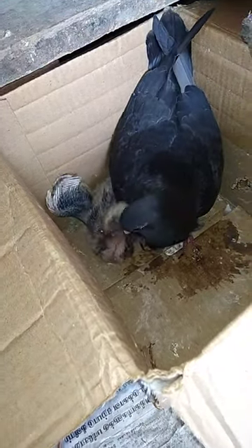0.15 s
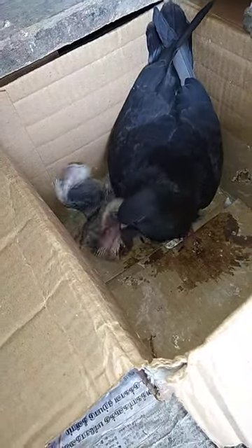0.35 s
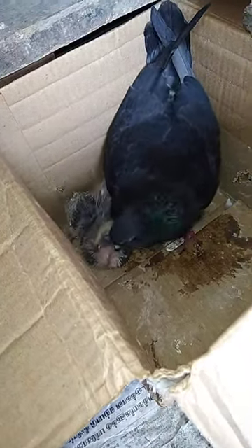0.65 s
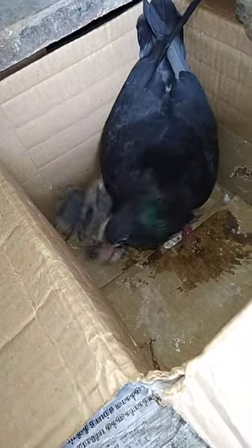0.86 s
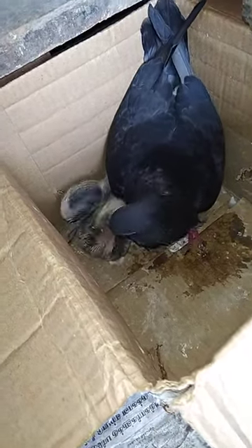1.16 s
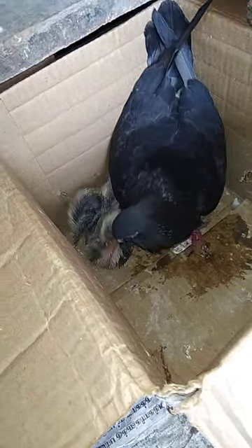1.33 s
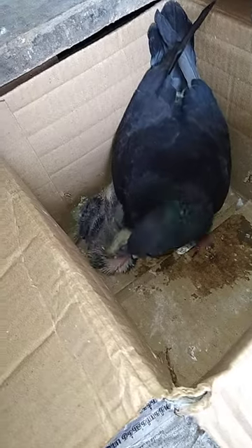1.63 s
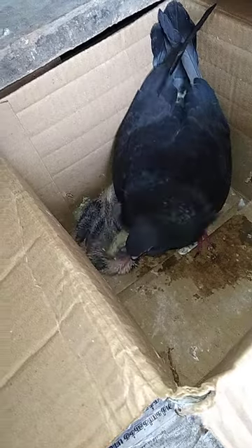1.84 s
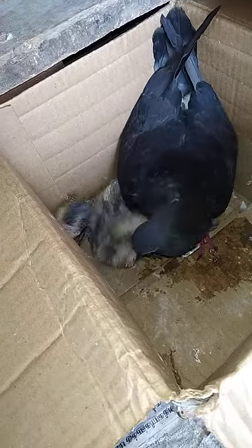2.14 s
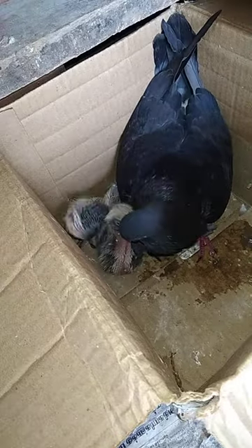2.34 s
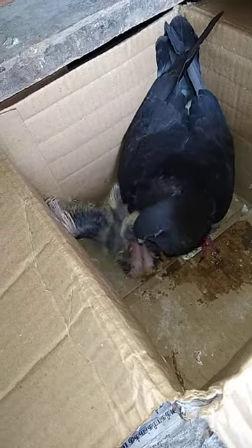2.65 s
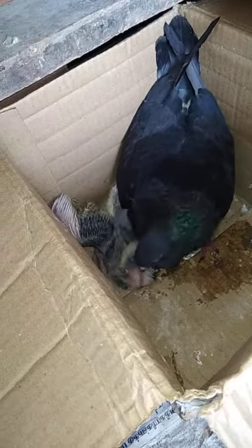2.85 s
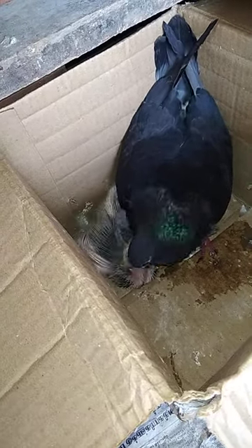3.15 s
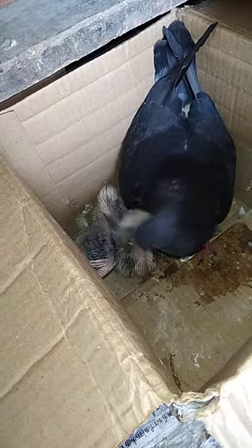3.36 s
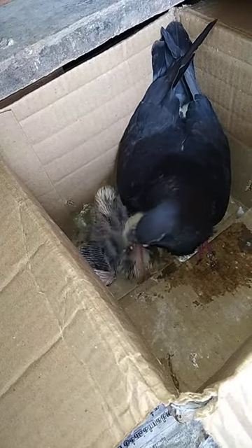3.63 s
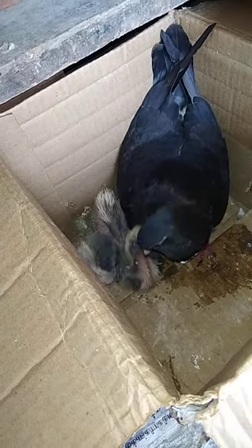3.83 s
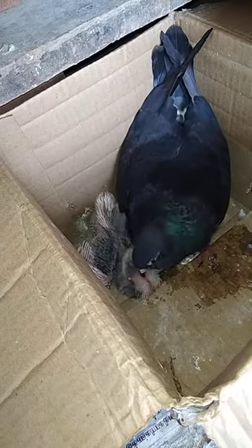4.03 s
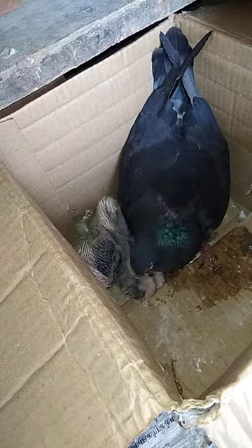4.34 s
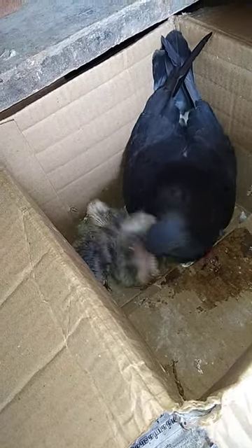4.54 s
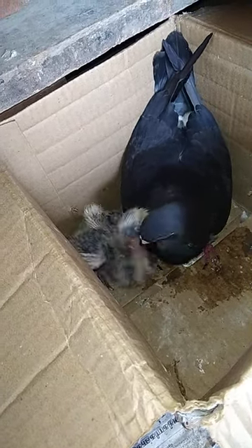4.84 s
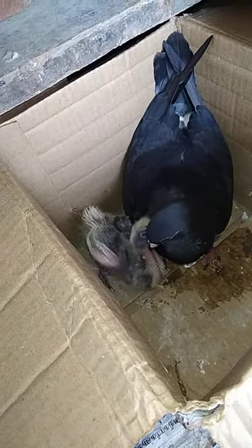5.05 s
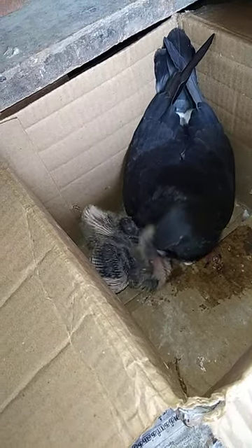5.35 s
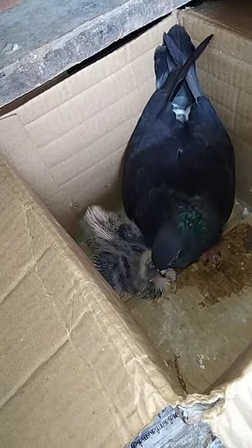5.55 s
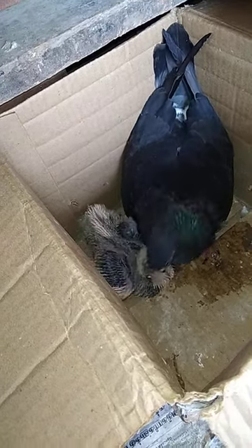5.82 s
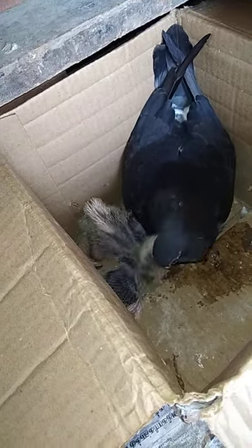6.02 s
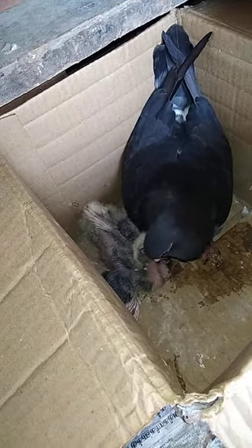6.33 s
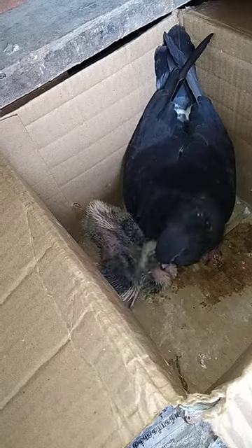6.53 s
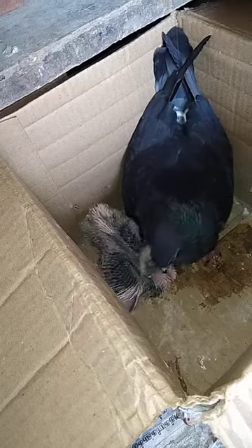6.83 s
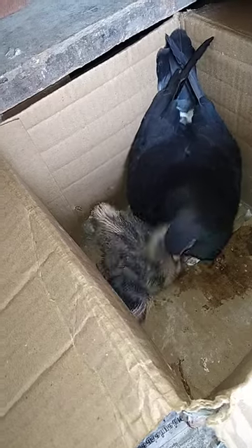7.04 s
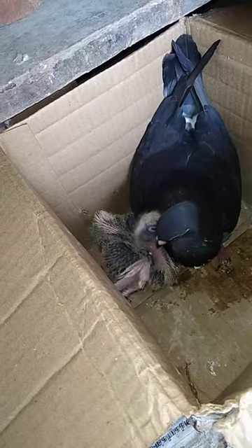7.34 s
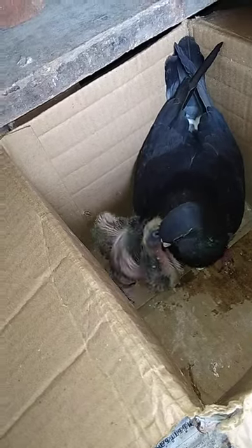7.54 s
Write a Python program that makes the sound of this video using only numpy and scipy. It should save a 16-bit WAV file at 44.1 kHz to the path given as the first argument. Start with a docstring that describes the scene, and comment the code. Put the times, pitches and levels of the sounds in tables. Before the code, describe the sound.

Close up, a pigeon coos in short rolling bursts of throbs, sliding into low notes and later soft hoots. A chick begs with thin, high peeps that crack into rasp. A sharp scuffle scrapes the cardboard box soon after two seconds, with small knocks elsewhere. Other birds murmur faintly behind, over a quiet hush in a small resonant space.

```python
"""Pigeons coo close by in a small loft: rolling throbs, gliding notes and hoots, sung as near-sine tones.
Further off others murmur as throbbing filtered noise. A chick in a cardboard box peeps for food in thin
whistles that crack into rasp. Feet, wings and beaks scuff and knock the card: shaped noise and ringing modes.
A faint hush lies under all. The microphone has two ports, and the right one hears much less bass."""
import sys
import numpy as np
from scipy import signal
from scipy.fft import rfft, irfft, next_fast_len
from scipy.io import wavfile
from scipy.ndimage import uniform_filter1d

SR = 44100
rng = np.random.default_rng(int(sys.argv[2]) if len(sys.argv) > 2 else 0)


def file_out(sig):
    """Save sig as 16-bit WAV at sys.argv[1]."""
    # one column per channel
    cols = np.atleast_2d(sig).T
    # limit, then scale
    lim = np.clip(cols, -1, 1)
    pcm = np.round(lim * 32767).astype(np.int16)
    wavfile.write(sys.argv[1], SR, pcm)


N = 338688

# air modes of the loft: (frequency [Hz], level [dB], time to fall 60 dB [s])
LOFT_MODES = [(232.2, -2, 0.32), (297.7, -7, 0.64), (490.7, -5.5, 0.73), (560, -1.5, 0.53), (642, 0, 0.23),
              (680, 5, 0.057), (797, 4, 0.097)]
# knocks on the card, levels relative within each part:
# (time [s], scratch level [dB], dull thud level [dB], panel ring level [dB])
CARD_KNOCKS = [(0.0418, -22, -33.5, -54), (0.158, -30, -29.5, -21), (0.9772, -20.5, -35.5, -40),
               (2.1585, -3, -26.5, -41), (2.2687, -2.5, -44, -54), (2.487, -20, -33, -35),
               (4.074, -30, -25.5, -31), (4.3939, -32, -37.5, -41), (6.1255, -50, -32, -26.5),
               (6.8917, -21, -38.5, -37), (7.0274, -25.5, -42.5, -49), (7.2095, -18, -28, -25.5)]


def gain_of(db):
    """Amplitude factor for a level in dB."""
    return 10 ** (np.asarray(db) / 20)


def evened(x):
    """Scales a sound to rms 1."""
    return x / np.sqrt(np.mean(x ** 2) + 1e-20)


def add(mix, s, sound):
    """Lays a sound into the mix from time s [s], cut at the end of the mix."""
    part = mix[round(s * SR):][:len(sound)]
    part += sound[:len(part)]


def columns(rows, t):
    """Interpolates each column of timed rows over the times t."""
    s, *values = np.transpose(rows)
    return [np.interp(t, s, v) for v in values]


def by_pitch(points, hz):
    """Reads a curve of (Hz, dB) points at a pitch."""
    return np.interp(hz, *np.transpose(points))


def coloured(x, points):
    """Filters by a spectrum of (Hz, dB) points, joined along log frequency."""
    size = next_fast_len(x.shape[-1])
    f, db = np.transpose(points)
    bins = np.fft.rfftfreq(size, 1 / SR)
    gain = gain_of(np.interp(np.log(bins + 1), np.log(f + 1), db))
    return irfft(rfft(x, size) * gain, size)[..., :x.shape[-1]]


def wander(size, span_s):
    """Smooth chance of rms 1: noise averaged twice over a span."""
    span = max(round(span_s * SR), 1)
    once = uniform_filter1d(rng.standard_normal(size), span)
    return evened(uniform_filter1d(once, span))


def rung(x, modes):
    """Passes x through dying modes; the answer to one click has energy 1."""
    t = np.arange(SR // 2) / SR
    ring = sum(gain_of(db - 60 * t / t60) * np.sin(2 * np.pi * hz * t) for hz, db, t60 in modes)
    return signal.oaconvolve(x, ring / np.linalg.norm(ring))[:len(x)]


def held(rows, waver, span_s, flutter_db):
    """A near-sine voice with an octave, wavering in pitch (share) and strength (dB)."""
    t = np.arange(rows[0][0], rows[-1][0], 1 / SR)
    hz, db, *octave_db = columns(rows, t)
    turns = 2 * np.pi * np.cumsum(hz * (1 + waver * wander(len(t), span_s))) / SR
    tone = np.sin(turns) + sum(gain_of(o) * np.sin(2 * turns) for o in octave_db)
    strength = np.sqrt(2) * gain_of(db + flutter_db * wander(len(t), span_s))
    return rows[0][0], strength * tone * signal.windows.tukey(len(t), .15)


def low(x):
    """The bass part: lifted 4 dB up to 520 Hz, gone above 1150 Hz."""
    return coloured(x, [(520, 4.0), (1150, -63.0)])


def diffuse(patchy_db):
    """Noise from all round in drifting patches: mostly common to both ports in the bass, unrelated above."""
    common, own = rng.standard_normal(N), rng.standard_normal((2, N))
    z = signal.stft(own + low(0.5 * common - 0.99 * own), nperseg=512)[2]
    patches = uniform_filter1d(rng.standard_normal(z.shape[1:]), size=3, axis=0)  # across frequency
    patches = uniform_filter1d(patches, size=5, axis=1)  # across time
    return signal.istft(z * gain_of(patchy_db * evened(patches)), nperseg=512)[1][:, :N]


def ports(x, echo_db):
    """The box walls send each port its own dense echoes, weaker in the bass; the direct sound is shared."""
    t = np.arange(SR // 10) / SR
    signs = rng.choice([-1., 1.], (2, len(t)))
    hits = rng.random((2, len(t))) < .1
    echoes = signs * hits * gain_of(-60 * t / 0.12)
    echoes /= np.linalg.norm(echoes, axis=1, keepdims=True)
    return x + gain_of(echo_db) * signal.oaconvolve((x - low(x))[None], echoes, axes=1)[:, :N]


def air():
    """The hush of the place: coloured diffuse noise at a steady mean level."""
    # spectrum of the hush: (frequency [Hz], density [dB per Hz])
    hush = [(15, -56), (25, -22), (70, -6.5), (144, -11), (296, 1), (396, -17), (656, -7.5), (1270, -15.5),
            (4560, -26.5), (5070, -44), (8630, -25), (14300, -115)]
    return gain_of(-49) * evened(coloured(diffuse(patchy_db=3.0), hush))


def murmur():
    """Pigeons further off: throbbing band noise, half of it ringing in the air of the loft."""
    # distant birds: (time [s], level [dB])
    distant = [(0, -49.5), (.52, -55), (.62, -48.5), (.9, -45.5), (1.52, -43.5), (1.7, -52.5), (2.3, -34),
               (2.72, -74), (2.9, -43.5), (3.02, -50), (3.14, -35.5), (3.8, -43.5), (4.22, -37.5),
               (4.31, -48.5), (4.7, -39.5), (5.02, -49.5), (6.05, -45), (6.9, -51.5), (7.68, -43.5)]
    throbbing = gain_of(9.5 * np.tanh(wander(N, 0.022)))
    band = [(130, -45.0), (215, 2), (750, 0.5), (1100, -40.0)]
    far = coloured(rng.standard_normal(N) * throbbing, band)
    far = evened(evened(far) + 1.01 * evened(rung(far, LOFT_MODES)))
    return far * gain_of(columns(distant, np.arange(N) / SR)[0])


def friction():
    """Feathers, feet, claws and quills on card: grainy noise whose dull and bright parts swell apart."""
    # spectrum of the grain: (frequency [Hz], density [dB per Hz])
    scratch_spectrum = [(260, -28), (450, -33), (491, -3.5), (528, -12.5), (5750, -20), (8620, -16),
                        (14300, -32)]
    # drags on the card; brightness raises the treble and lowers the rest:
    # (time [s], length [s], level [dB], brightness [dB])
    rubs = [(0.079, 0.23, -46, -4), (0.912, 0.022, -48, -5), (1.082, 0.066, -49.5, 0),
            (2.136, 0.16, -31, -3), (2.268, 0.1, -28, 2), (2.341, 0.082, -33.5, 1.5),
            (2.414, 0.051, -40, 10), (2.443, 0.2, -33, 0.5), (2.571, 0.039, -41, 9.5),
            (2.609, 0.082, -48, -3.5), (2.681, 0.048, -43.5, -3.5), (2.706, 0.11, -45.5, -2.5),
            (2.953, 0.041, -56.5, 3), (3.258, 0.072, -43, -4), (3.322, 0.07, -48, -5),
            (3.756, 0.071, -46.5, -0.5), (4.624, 0.21, -47, -1), (5.217, 0.17, -49, 2.5),
            (5.685, 0.088, -59, -12.5), (5.94, 0.14, -40.5, -2.5), (6.09, 0.11, -42.5, -2),
            (6.334, 0.068, -47.5, -2), (7.066, 0.16, -49, -5), (7.318, 0.13, -52.5, 4.5)]
    # claws and quills ticking on the card: (time [s], relative level [dB])
    ticks = [(1.094, -36), (2.1625, -16), (2.273, -8), (2.584, -28), (2.842, -26), (3.242, -24.5),
             (3.442, -37), (3.7576, -31), (5.029, -37), (5.658, -38), (5.719, -36), (5.898, -32.5),
             (6.213, -39), (6.372, -30)]
    roughness = gain_of(1.2 * wander(N, 0.0005) + 1.8 * wander(N, 0.009))
    grain = evened(coloured(diffuse(patchy_db=3.5) * roughness, scratch_spectrum))
    bright = coloured(grain, [(4000, -8.5), (6500, 0.5)])
    floor = gain_of(-63 + 2.0 * wander(N, 0.018))  # a faint, unsteady floor of grainy noise
    dull_level, bright_level = floor.copy(), floor.copy()
    for s, length, db, bright_db in rubs:
        stroke = signal.windows.tukey(round(max(length, .01) * SR), .55)
        add(dull_level, s, gain_of(db - bright_db) * stroke)
        add(bright_level, s, gain_of(db + bright_db) * stroke)
    tail = np.arange(SR // 4) / SR
    for s, db in ticks + [row[:2] for row in CARD_KNOCKS]:
        slow, fast = gain_of(db - 24.0 - 60 * tail / 0.16), gain_of(db - 15.5 - 60 * tail / 0.036)
        scratch = (slow + fast) * np.minimum(tail / 0.00044, 1)
        add(dull_level, s, scratch)
        add(bright_level, s, scratch)
    return dull_level * (grain - bright) + bright_level * bright


def knocks():
    """Blows on the box: a dull burst of noise, and the panels ringing in their modes."""
    # modes of the panels: (frequency [Hz], level [dB], time to fall 60 dB [s])
    box_modes = [(498, 8, 0.1), (664, -2, 0.06), (784, -8, 0.05), (1050, -10, 0.04), (1450, -6, 0.075)]
    blow, ring, tail = np.zeros(N), np.zeros(N), np.arange(SR // 4) / SR
    push = np.pad(np.diff(np.hanning(30)) * 2, (0, len(tail)))  # the panel is pushed in and springs back
    for s, _, thud_db, box_db in CARD_KNOCKS:
        add(blow, s, gain_of(thud_db) * tail / 0.0096 * np.exp(1 - tail / 0.0073))
        # each blow lands on another part of the card: chance in pitch (share) and level (dB)
        chance = rng.standard_normal((len(box_modes), 2)) * [.02, 3.5]
        modes = [(hz * (1 + a), db + b, t60) for (hz, db, t60), (a, b) in zip(box_modes, chance)]
        add(ring, s + 0.00204, gain_of(box_db + 18.5) * rung(push, modes))
    dull = [(200, -17), (400, 10.0), (2300, -4), (5000, -29.0)]
    thud = blow * evened(coloured(rng.standard_normal(N), dull))
    return gain_of(-5.0) * thud + ring


def peep(s, length, from_hz, top_hz, share, fall_s, db, octave_db, crack):
    """Rows of pitch, level and octave along one arch, and how cracked the voice is."""
    # loudness of the voice: (pitch [Hz], level [dB])
    loudness = [(3900, -5), (4550, 1), (5000, -1), (5400, 0), (5750, -4), (6250, -1)]
    end_hz, drop_db = 3950, 5  # the falling end is pushed harder
    t = np.linspace(0, length, num=60)
    rise = np.minimum(t / (share * length), 1)
    fall = np.clip(1 - (length - t) / fall_s, 0, 1)
    hz = from_hz + (top_hz - from_hz) * rise ** .85 - max(top_hz - end_hz, 0) * fall ** .9
    cracked = np.clip(crack, 0, .9) * rise ** 5.0 * (1 - fall) ** 2
    clear_db = 20 * np.log10(1 - cracked)  # what the crack leaves of the whistle
    level = db + by_pitch(loudness, hz) + drop_db * (fall > 0) + clear_db
    return np.transpose([s + t, hz, level, octave_db - clear_db - 9 * (1 - rise)]), cracked


def chick():
    """Thin whistles that crack into a rasp at the top, with a second strand below and a hiss of air."""
    # a peep climbs to its top, may crack while it holds there, and drops away:
    # (time [s], length [s], start pitch [Hz], top pitch [Hz], climb [share of length], fall [s],
    #  level [dB], octave over the pitch [dB], crack [0-1], lower strand [dB])
    peeps = [(0.449, 0.14, 4200, 6090, 0.55, 0.037, -49, -23, 0.6, -12),
             (1.346, 0.16, 4300, 5530, 0.2, .035, -51, -20, 0.4, -13.5),
             (1.675, 0.022, 3700, 3730, 0.32, 0.012, -56, -3, 0.2, -18),
             (2.885, 0.022, 4150, 4150, .45, 0.0077, -56, -6, 0.3, -7),
             (3.824, 0.1, 4300, 5310, 0.76, 0.034, -60.5, 2, 0.2, -1.5),
             (3.922, 0.064, 4750, 5780, .55, 0.032, -57, -0.5, 0.6, -0.5),
             (5.027, 0.12, 4020, 5190, 0.4, .035, -53, -23, .3, -16),
             (5.138, 0.063, 4420, 6090, 0.44, 0.022, -47.5, -26, 0.1, -23),
             (5.37, .188, 3900, 5750, 0.52, .034, -47, -15, .7, -10),
             (6.454, 0.18, 4270, 6290, 0.89, 0.038, -54.5, -10, 0.8, -17),
             (7.495, 0.28, 4070, 6270, 0.65, .04, -64.5, -11.5, 0, -5.5)]
    out = np.zeros(N)
    for *row, strand_db in peeps:
        rows, cracked = peep(*row)
        s, tone = held(rows, waver=.022, span_s=.004, flutter_db=4)
        size, u = len(tone), np.linspace(0, 1, len(tone))
        strand_rows = rows * [1, .85, 0.89, 0.77] + [0, -1, -5.5, 5]  # time, pitch, level, octave
        strand = held(strand_rows, waver=0.0217, span_s=0.0043, flutter_db=9)[1]
        tone = tone + gain_of(strand_db - 12 * u) * strand  # the strand dies away along the peep
        hiss_spectrum = [(3000, -0.5), (5000, 4), (8500, 13.0), (13000, -6.0)]
        hiss = evened(coloured(rng.standard_normal(size), hiss_spectrum))
        hiss *= np.sqrt(abs(uniform_filter1d(tone ** 2, 1500)))  # follows the strength of the tone
        mid, width = 1.15 * row[3], .2  # the rasp centres above the top pitch; width is a share of its centre
        band = [(mid * (1 + k * width), db) for k, db in [(-2, -30), (-1, -6), (0, 0), (1, -6), (2, -30)]]
        rasp = evened(coloured(rng.standard_normal(size), band)) * gain_of(4 * wander(size, .004))
        rasp *= gain_of(row[6] - 8) * np.interp(u, np.linspace(0, 1, len(cracked)), cracked)
        add(out, s, tone + rasp + gain_of(-12) * hiss)
    return out


def throb(db, overtone_hz):
    """The inflated throat sounds a quick swelling tone; its overtone is husky, raspy and slides upward."""
    # strength of the overtone over the pitch: (overtone frequency [Hz], level [dB])
    overtone_strength = [(480, -2), (560, -4), (650, -3), (700, 2)]
    t = np.arange(0, .07, 1 / SR)
    pitch_hz = min(0.565 * overtone_hz, 303.4)  # the swollen crop holds the pitch under this
    swell = np.sin(np.pi * np.minimum(t / 0.034, 1) ** 0.75) ** 2.1  # peaks early, over within 34 ms
    tone = np.sin(2 * np.pi * pitch_hz * t) * swell * gain_of(4)
    slide = .96 + 1.6 * t + .04 * wander(len(t), .006)
    turns = 2 * np.pi * np.cumsum(overtone_hz * slide) / SR
    husk = 1 + .45 * wander(len(t), .005)
    rasp_band = [(380, -40), (450, 0), (680, 0), (760, -40)]
    rasp = .45 * evened(coloured(rng.standard_normal(len(t)), rasp_band))
    overtone = (husk * np.sin(turns) + rasp) * (t / .015 * np.exp(1 - t / .015)) ** 1.4
    overtone *= gain_of(by_pitch(overtone_strength, overtone_hz))
    return gain_of(db) * (tone + overtone * signal.windows.tukey(len(t), .3))


def roll(first_s, last_s, count, growth, db, soft_db, first_hz, top_hz):
    """Throbs that slow down while effort rises and pitch closes on its final value."""
    swell_throbs, climb_throbs = 1, 1.693  # time constants of effort and pitch, in throbs
    k = np.arange(round(count))
    slack, chance = np.exp(-k / swell_throbs), rng.standard_normal((len(k), 2))
    s = first_s + (last_s - first_s) * (growth ** k - 1) / (growth ** k[-1] - 1)
    hz = top_hz - (top_hz - first_hz) * np.exp(-k / climb_throbs)
    hz = hz * (1 + 0.022 * chance[:, 0])
    return list(zip(s, db - soft_db * slack + 1.38 * chance[:, 1], hz))


def hoot(s, db):
    """Rows of pitch and level: steady, high and faint up to the break, then sinking to a round hoot."""
    # loudness of the voice: (pitch [Hz], level [dB])
    loudness = [(392, 0), (410, -10.5), (490, 4), (700, -16.5)]
    lead_s, hold_s, sink_s = 0.13, 0.18, 0.0163
    high_hz, low_hz = 712, 380
    t = np.arange(-lead_s, hold_s, 1 / 500)
    hz = low_hz + (high_hz - low_hz) * np.exp(-np.maximum(t, 0) / sink_s)
    return np.transpose([s + t, hz, db + by_pitch(loudness, hz)])


def coos():
    """Pigeons nearby: throbs, gliding notes and hoots; the air of the loft rings with them."""
    # rolling coos; each gap between throbs outlasts the one before:
    # (first throb [s], last throb [s], throbs [count], gap growth [ratio], full level [dB],
    #  first throb's shortfall [dB], first overtone [Hz], final overtone [Hz])
    rolls = [(0.983, 1.187, 6, 1.11, -28.5, 9, 427, 619), (1.918, 2.158, 6, 1.19, -26.5, 7.5, 458, 584.5),
             (3.217, 3.438, 6, 1.02, -26, 0.5, 614, 598), (4.349, 4.562, 6, 1.21, -25, 7, 447, 642.5),
             (5.221, 5.469, 4, 1.45, -29.5, 10.5, 475, 677), (6.304, 6.483, 3, 1.7, -29, 9.5, 494, 692),
             (7.337, 7.484, 3, 1.35, -30.5, 8.5, 475, 698)]
    # lone throbs: (time [s], level [dB], overtone [Hz])
    lone_throbs = [(3.075, -41, 455), (3.116, -36.5, 497), (3.612, -28.5, 513.6), (3.916, -35, 493),
                   (4.029, -38, 561), (4.15, -29, 560), (4.608, -30.5, 509), (4.709, -25.5, 519),
                   (5.05, -36, 500), (5.806, -29, 570), (6.836, -30.5, 557.5)]
    # held notes that glide in pitch and level: (time [s], length [s], start pitch [Hz], end pitch [Hz],
    #  start level [dB], end level [dB], octave over the pitch [dB])
    notes = [(1.22, 0.16, 519.3, 479, -58, -40.5, -41), (1.342, 0.037, 337.6, 229, -41, -37, -20),
             (1.372, 0.081, 226, 186, -42, -49, -4), (2.239, 0.074, 251, 192, -36.5, -50, -11),
             (3.477, .13, 345, 312.6, -34.5, -32, -23), (3.48, 0.16, 558.5, 532, -37, -38.5, -30),
             (3.651, 0.095, 268.4, 239, -34.5, -34, -0.5), (4.534, 0.11, 372, 375, -34, -42, -38),
             (4.599, 0.1106, 656.6, 535, -40, -33, -32), (4.738, 0.1, 273.3, 225.4, -36.5, -38.5, 0.5),
             (7.002, 0.24, 174, 231.3, -55.5, -42.5, -24)]
    # thin high notes that break and sink: (time of the break [s], level [dB])
    hoots = [(5.632, -33), (6.678, -37), (7.653, -43.5)]
    near = np.zeros(N)
    for s, *row in sum((roll(*row) for row in rolls), lone_throbs):
        add(near, s - .001, throb(*row))  # starts 1 ms before the listed time
    for s, length, hz, to_hz, db, to_db, octave_db in notes:
        glide = [(s, hz, db, octave_db), (s + length, to_hz, to_db, octave_db)]
        add(near, *held(glide, waver=.016, span_s=.012, flutter_db=3))
    for row in hoots:
        add(near, *held(hoot(*row), waver=.008, span_s=.015, flutter_db=1.8))
    return near + gain_of(-27) * rung(near, LOFT_MODES)


def scene():
    """Hush and friction arrive from all round; birds and knocks reach the ports with echoes."""
    around = air() + friction()
    pigeons = ports(murmur() + coos(), echo_db=0.0)
    return around + pigeons + ports(knocks(), echo_db=3.0) + ports(chick(), echo_db=5.0)


def record(dry):
    """The ports share the sound unevenly by pitch and drop the deepest bass; then the band limit."""
    # balance of the microphone ports: (frequency [Hz], left over right [dB])
    balance = [(60, 8.5), (300, 16), (420, 4), (600, -5), (800, 1), (4000, -1.5), (7500, -4.5), (9200, 1)]
    hz, db = np.transpose(balance)
    left = 2 / (1 + gain_of(-db))  # the two gains add up to 2
    shared = [coloured(x, np.transpose([hz, 20 * np.log10(g)])) for x, g in zip(dry, (left, 2 - left))]
    trimmed = coloured(np.array(shared), [(28, -15), (48, -0.5)])
    band_limit = signal.firwin(511, 14500, window=("kaiser", 9), fs=SR)  # lowpass edge in Hz
    return signal.oaconvolve(trimmed, band_limit[None], "same")


dry = scene()
out = record(dry)
file_out(out)
```